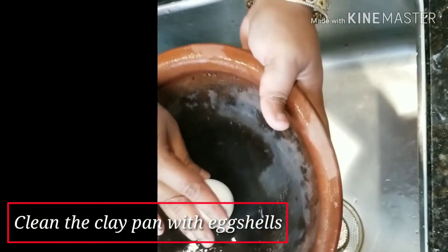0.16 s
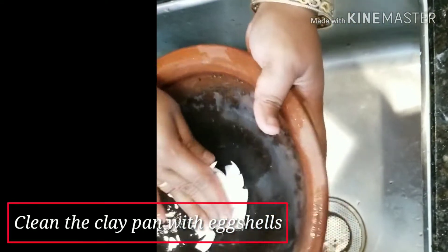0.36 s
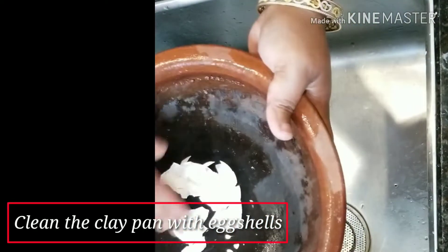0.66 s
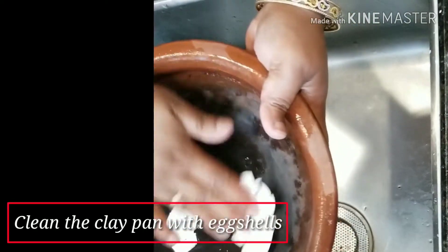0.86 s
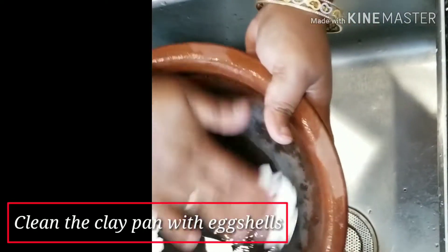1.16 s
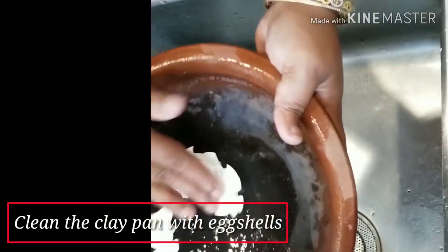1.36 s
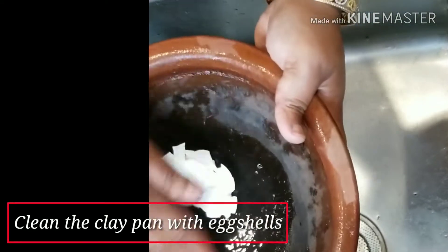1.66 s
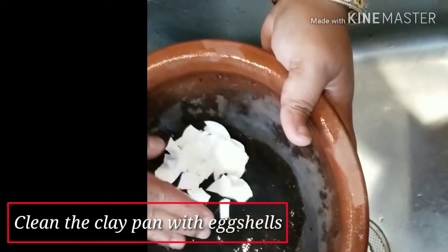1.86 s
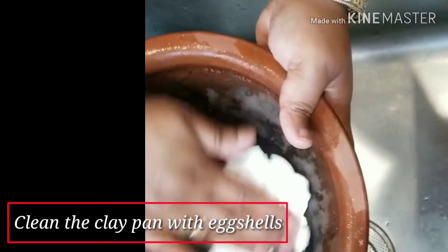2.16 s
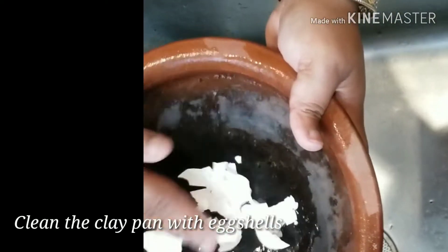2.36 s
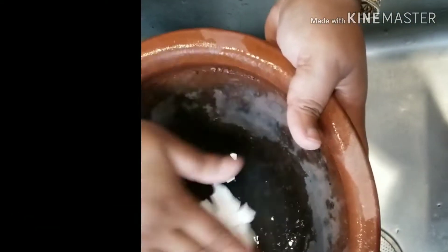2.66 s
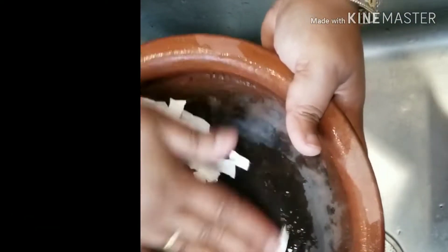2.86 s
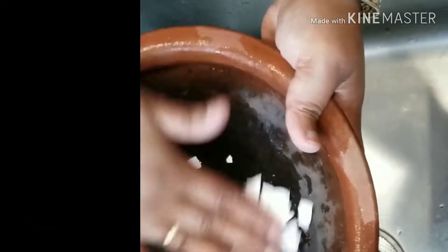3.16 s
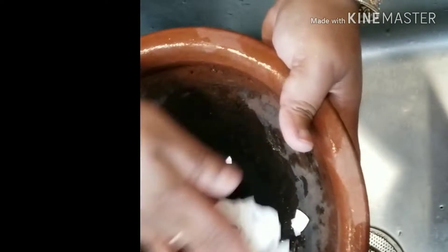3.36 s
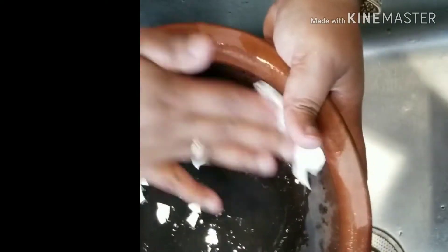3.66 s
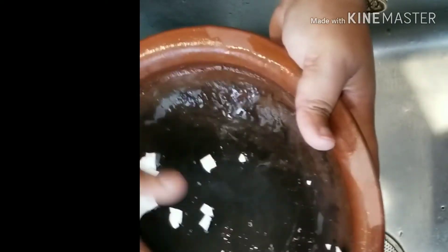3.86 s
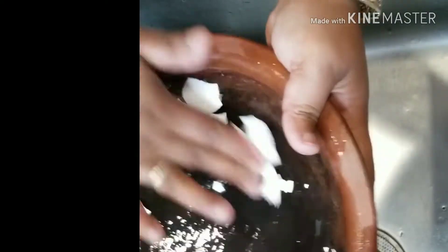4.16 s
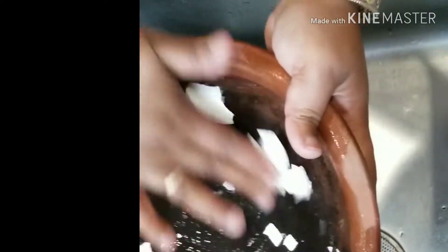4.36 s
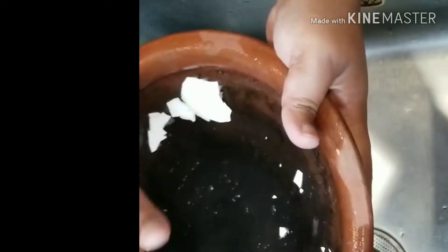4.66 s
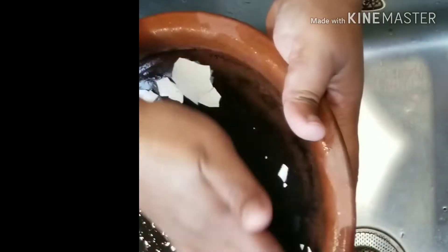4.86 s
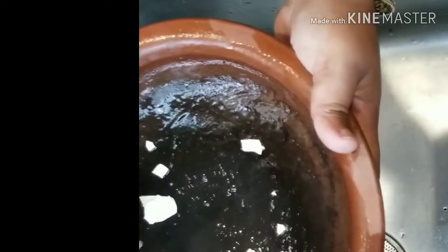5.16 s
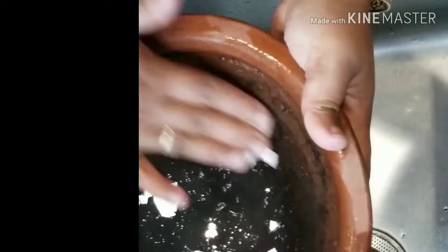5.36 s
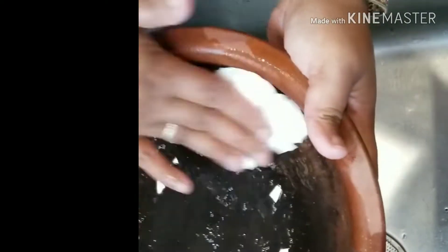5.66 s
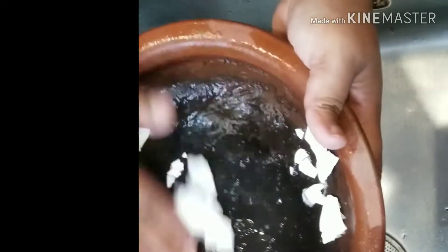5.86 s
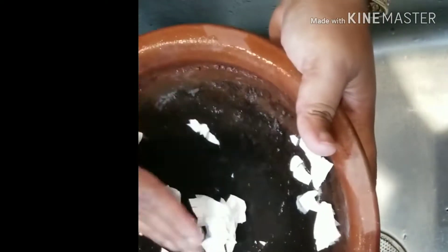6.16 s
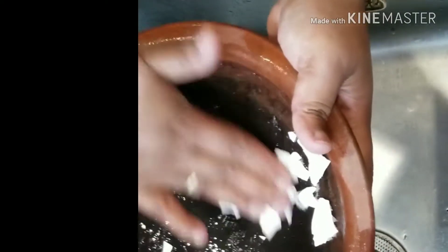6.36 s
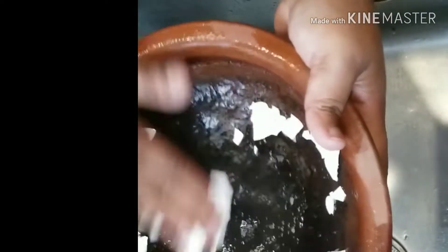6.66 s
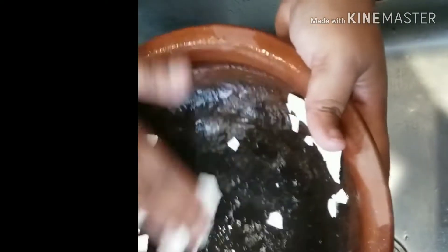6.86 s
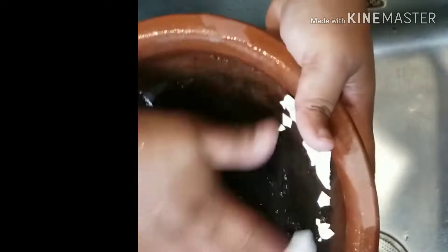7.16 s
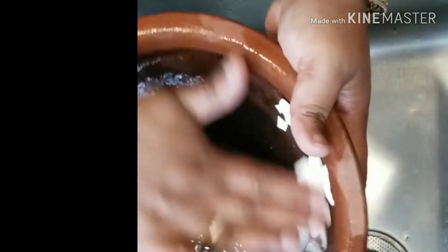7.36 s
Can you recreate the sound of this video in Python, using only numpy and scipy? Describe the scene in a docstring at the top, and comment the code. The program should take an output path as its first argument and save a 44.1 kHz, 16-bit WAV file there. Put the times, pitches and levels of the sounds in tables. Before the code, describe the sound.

In a small kitchen, heard close in stereo over a faint low hum and dull room air, an eggshell caves in almost immediately. From 0 to 0.3 seconds a volley of loud, sharp, hollow cracks bursts through a dull crumple and fine crackle. After a quiet gap with a small snap, gritty scraping runs from about 0.7 to 1.35 seconds, then shorter rubs at 1.6 and 2 to 2.3, with shell edges ringing the clay pan briefly. Another stroke begins at 2.5 with a clear snap. At about 2.85 the sound abruptly speeds up: scraping turns higher, brighter and fizzier, and its decays shorten. Short rubs lead into a longer to-and-fro scrub from 3.6 to 4.6, snapping near 4.2. Brisk strokes follow from 4.8 and 5.2, with soft bumps, then almost unbroken rubbing from 6.3 until the end at 7.5.

```python
"""A low hum; an eggshell caves in with a dull crumple amid a volley of sharp, hollow cracks.
A hand scrubs the pieces round a wet clay pan in gritty to-and-fro rubs, amid stray snaps and dull bumps.
Noise grains make the scrape, fizz and crumple; pushes on tuned resonances make the hollow, ring and thud.
A small kitchen answers with decaying noise; sines and shaped noise make the hum and room air.
Part-way through, playback jumps to a faster speed, so pitches rise and decays shorten."""
import sys
import numpy as np
from scipy import signal
from scipy.fft import rfft, irfft, next_fast_len
from scipy.io import wavfile
from scipy.ndimage import map_coordinates

SR = 44100
rng = np.random.default_rng(int(sys.argv[2]) if len(sys.argv) > 2 else 0)


def bounce(signal):
    """Save signal as a 16-bit WAV file at the path given by the first command-line argument."""
    frames = np.transpose(np.atleast_2d(signal))
    limited = np.clip(frames, -1, 1)
    pcm = np.round(limited * 32767).astype(np.int16)
    wavfile.write(sys.argv[1], SR, pcm)


N = 330750

# Levels in the tables come before each layer's own gain; f and widths are at natural speed, t is as heard.
# push and pull rubs, one list per stroke from landing to lifting: start t/s, length/s, scrape level/dB,
# sharp-edge fizz level/dB re scrape, pan ring level/dB re scrape
RUB_STROKES = [
    [(0.228, 0.049, -20.5, -2.5, 1), (0.305, 0.04, -41, -1, -14), (0.401, .08, -51.5, -6.5, 0.5),
     (0.507, .015, -57, -7, 0)],
    [(0.715, 0.034, -50, -0.5, 5.5), (0.762, 0.18, -37.5, -3.5, 1.5), (0.951, 0.18, -36.5, -3, 0),
     (1.128, 0.11, -33, -3.5, -1.5), (1.266, 0.084, -37.5, -4.5, 0)],
    [(1.561, .03, -52, 2.5, -14), (1.605, 0.035, -59.5, 0, -12), (1.656, 0.092, -34.5, -4, 1),
     (1.833, 0.066, -62, -5, -1)],
    [(1.949, 0.13, -38.5, -2, 2.5), (2.040, 0.23, -26, -4, -7.5), (2.249, 0.088, -33, -2, 1.5)],
    [(2.515, 0.19, -33, -3.5, 1.5), (2.626, 0.06, -26.5, -3, 0.5), (2.697, 0.13, -29, -0.5, 1),
     (2.859, .025, -37.5, 1, 5), (2.886, 0.023, -38.5, 5, 6.5), (2.987, 0.021, -57.5, -0.5, 10)],
    [(3.048, 0.12, -39.5, 6, -8), (3.139, 0.058, -33.5, 0, -7.5), (3.185, 0.036, -38, 2.5, 3)],
    [(3.391, 0.068, -34.5, 6.5, -0.5), (3.448, 0.066, -37, 9.5, -13.5), (3.559, 0.033, -54.5, 4.5, -0.5)],
    [(3.629, 0.27, -29, 4.5, -15), (3.854, 0.073, -36.5, 4.5, 4), (3.914, 0.1, -31.5, 4, 2.5),
     (4.006, 0.1, -34, 2.5, 1.5), (4.109, .10, -32, 2, 3), (4.206, 0.11, -32.5, 0, -3),
     (4.318, .09, -32, 2, 0), (4.422, 0.054, -28.5, 0.5, -2.5), (4.496, 0.078, -32, 3, 0.5),
     (4.572, 0.057, -32.5, 0.5, -6)],
    [(4.782, 0.24, -40, 4.5, -9.5), (4.943, 0.14, -28.5, 2.5, -15), (5.078, 0.071, -30.5, -1.5, -9.5)],
    [(5.234, .035, -40, 6.5, -2.5), (5.312, 0.076, -32, 1.5, -5.5), (5.418, .05, -32.5, 8.5, -3),
     (5.477, 0.17, -35, -0.5, -6.5), (5.593, 0.18, -30, 2.5, -2), (5.731, .065, -24.5, 0, -10),
     (5.790, 0.068, -30.5, 0, 3), (5.853, 0.13, -33.5, 2.5, 2.5), (5.973, 0.09, -30, -1.5, 3),
     (6.083, 0.051, -45, 3.5, 6), (6.173, 0.019, -67.5, 1, 7)],
    [(6.278, 0.086, -48, 2, 3), (6.332, 0.088, -35, 0.5, 2.5), (6.402, 0.091, -29, -3.5, -4.5),
     (6.493, 0.086, -29.5, -1, 1.5), (6.571, 0.13, -29.5, 1, -1.5), (6.672, 0.11, -30, 0.5, 0.5),
     (6.762, 0.15, -30, -2, -3), (6.861, 0.13, -28.5, -2.5, -2.5), (6.95, 0.14, -31.5, -2, -1),
     (7.077, .08, -32.5, 2, 3.5), (7.157, 0.12, -30, -1.5, -5), (7.262, 0.08, -32.5, -3, 0),
     (7.352, 0.077, -34.5, 0, -26), (7.437, .08, -36, 4.5, -8.5)],
]
# the palm's dull rub: t/s, level/dB at full pressure
PALM_CONTACT_CURVE = [(0.2, -25), (1.2, -27), (2.0, -28.5), (3.0, -25.5), (4.4, -21.5), (6.0, -24),
                      (7.5, -22.5)]
# the shell caving in under the palm: t/s, dull crumple level/dB, fine crackle level/dB
CRUSH_CURVE = [(0.035, -25.5, -36.5), (0.054, -31, -33), (0.094, -38, -48), (0.188, -26, -36),
               (0.214, -27.5, -35), (0.231, -12, -40.5), (0.3, -58.5, -48)]
# cracks of the whole shell: t/s, snap level/dB, hollow ring level/dB re snap
SHELL_CRACKS = [(0.0376, -20, 5.5), (0.0449, -4.5, -3), (0.0539, -12, 4.5), (0.0561, -17.5, 11),
                (0.128, -4.5, -16), (0.157, -4.5, -13), (0.1643, -13, -3.5), (0.1786, -10, 5.5),
                (0.1973, -5.5, -6.5), (0.2036, -7, -8), (0.232, -14.5, 2), (0.2385, -22.5, 2),
                (0.2473, -17, -5), (0.255, -19, -11.5), (0.263, -6.5, -25), (0.2705, -9, -15.5)]
# loose pieces snapping or tapping on the clay: t/s, snap level/dB, pan ring level/dB re snap
LOOSE_CHIPS = [(0.3533, -21, -3.5), (0.7437, -42.5, 7), (1.5722, -33, -23), (1.6508, -19, -18),
               (1.9617, -17.5, -17), (2.5221, -17.5, -9), (2.563, -11.5, -12.5), (2.9961, -42, 3.5),
               (3.1555, -18, -19), (3.3013, -33.5, -21), (3.3717, -28.5, -20), (3.556, -31, -26),
               (4.19, -13.5, -30), (4.7707, -25.5, -27), (5.247, -38, -22), (5.427, -26, -22),
               (6.31, -38, -5)]
# the hand bumping the pan dully: t/s, level/dB
HAND_BUMPS = [(1.179, -47), (2.659, -45), (3.154, -40), (3.76, -37), (5.769, -35)]
# ringing modes of the pan: f/Hz, width/Hz, level/dB
PAN_MODES = [(810, 40, -18), (1215, 50, -12), (1368, 28, 5), (1475, 100, -2), (1582, 45, -1),
             (1665, 50, -9), (2152, 42, -6), (2460, 40, -9), (2542, 42, -9), (2920, 36, -8),
             (3070, 80, -14), (3610, 60, -12)]
# ringing modes of the hollow shell: f/Hz, width/Hz, level/dB
HOLLOW_MODES = [(900, 60, -27), (1040, 90, -0.5), (1238, 51, -15), (1264, 82, -4), (1540, 99, 5.5),
                (1890, 66, -9), (2080, 100, -7), (2340, 58, -2)]
# low modes of the pan's thud: f/Hz, width/Hz, level/dB
THUD_MODES = [(170, 60, -6.5), (245, 60, 5.5), (325, 58, -0.5), (491.6, 20, -12)]
# tone of shell edges on clay: f/Hz, level/dB per Hz
GRIT_TONE = [(400, -48), (650, -29), (810, -16), (930, -19), (1280, -17), (1360, -5), (2000, -4),
             (2700, -2), (3800, 0), (5000, -1), (7400, -1), (8700, -6), (12500, -6), (16000, -7)]
# tone of pieces grinding dully: f/Hz, level/dB per Hz
GRIND_TONE = [(300, -40), (620, -14), (790, 0), (900, -1), (1100, -3), (1300, -14), (2000, -50)]
# tone of the rubbing palm: f/Hz, level/dB per Hz
PALM_TONE = [(40, -44), (100, 8.5), (170, -1), (250, 8), (350, 1.5), (480, -0.5), (600, -7.5), (800, -4.5),
             (1300, -22.5), (3000, -84)]
# tone of a snap: f/Hz, level/dB per Hz
SNAP_TONE = [(300, -6.5), (600, -24), (1000, -22.5), (2000, -7.5), (4500, 7), (7000, 6.5), (11000, 0.5),
             (16000, 7)]
# tone of the fine crackle: f/Hz, level/dB per Hz
CRACKLE_TONE = [(250, -28.5), (450, -21.5), (800, -1.5), (1400, 2.5), (3000, 4.5), (5000, -4.5), (8000, -7),
                (16000, -10.5)]
# decay of the kitchen's tail: f/Hz, t60/s
KITCHEN_DECAY = [(200, 0.52), (800, 0.33), (2000, 0.33), (6000, .34), (15000, .26)]
# stereo width: f/Hz, gain of side re mid/dB
STEREO_WIDTH = [(60, -17), (200, -13), (700, -8), (1400, -5), (2400, -1), (4400, 0), (15000, 0)]
# stereo lean: f/Hz, gain of left re right/dB
STEREO_LEAN = [(60, -.7), (1400, -.3), (3500, .5), (5500, 2.2), (8500, -.6), (11000, -.5), (15000, 0)]
# tone of the room air: f/Hz, level/dB per Hz
AIR_TONE = [(20, -10), (50, -1.5), (110, 0.5), (200, -5), (400, -12.5), (700, -23.5), (2000, -31.5),
            (16000, -46.5)]
# partials of the hum: f/Hz, level/dB
HUM_PARTIALS = [(53.6, -66.5), (107, -64), (120, -64), (254, -79.5)]
# slow swell of hum and air together: t/s, level/dB
BACKGROUND_SWELL = [(0, 3), (0.7, -7.5), (1.6, -2), (2.2, 1), (2.85, 1), (7.5, 1)]

NATURAL, FAST_SPEED = 1, 1.6  # playback speed ratios
FAST_FROM_S = 2.855
TOP_HZ = 15600  # band limit
# the first rub of a stroke bites; every rub is released at its end (at natural speed)
BITE_S, RELEASE_DB_PER_S = 0.014, 333.5
TURN_DB_PER_S = 259.5  # within a stroke the hand only turns round, and the next rub eases in
SWELL_DB, SWELL_GROWS = 16.5, 0.53  # swell depth in a one-second rub; shorter rubs swell less, by this power
SWELL_SKEW, SWELL_ROUND = 1.095, 0.96  # skew above 1 delays the peak; round above 1 makes it more pointed
FLUTTER_DB, FLUTTER_RATE = 0.51, 24  # pieces catch and let go; random knots a second at natural speed
FIZZ_GROWS, RING_GROWS = 0.99, 1.16  # light contact still fizzes; the ring falls faster than the pressure
PALM_GROWS = 0.88  # the palm's rub follows the pressure less than dB for dB
EDGE_HZ, EDGE_DB = 1302, -5.5  # below its first strong mode the pan's ring is turned down this much
GRIND_DB = -26.5  # grinding under the fingers, on top of the scrape's contact level
CRACK_THUD_DB, CHIP_THUD_DB = -27.5, -31.5  # thud push re a crack's hollow push, and re a chip's snap level


def amp(db):
    """Decibels to gain."""
    return 10 ** (np.asarray(db) / 20)


def unit(x):
    """Scale to rms 1."""
    return x / np.sqrt(np.mean(np.abs(x) ** 2) + 1e-20)


def along(points, hz):
    """Read (f/Hz, value) points on a log frequency axis."""
    f, value = np.transpose(points)
    return np.interp(np.log(hz + 1), np.log(f + 1), value)


def gate(s, db, rise):
    """A gain per sample from a level curve; the contact takes a moment to build."""
    t = np.arange(N) / SR
    onset = np.clip((t - s[0]) / rise, 0, 1)
    return amp(np.interp(t, s, db)) * onset * (t < s[-1])


def wobble(rate):
    """A smooth random curve, rate knots a second."""
    knots = rng.standard_normal(int(N * rate / SR) + 4)
    return map_coordinates(knots, [np.arange(N) * rate / SR], order=2)


def filtered(x, response):
    """Filter x by a complex response of frequency."""
    m = next_fast_len(N + SR // 4, True)
    return irfft(rfft(x, m) * response(np.fft.rfftfreq(m, 1 / SR)), m)[..., :N]


def colour(x, spectrum, speed):
    """Shape noise by a spectrum, keeping its power."""
    return filtered(x, lambda hz: unit(amp(along(spectrum, hz / speed))))


def resonate(x, modes, speed, cutoff_hz):
    """Ring a body's modes with x at rms gain 1; below the cutoff a small body hardly radiates."""
    def response(hz):
        f = hz / speed
        body = sum(amp(db) * 1j * f * w / (c * c - f * f + 1j * f * w) for c, w, db in modes)
        radiation = (f * f / (cutoff_hz ** 2 - f * f + 1j * f * cutoff_hz)) ** 2
        return unit(body * radiation)
    return filtered(x, response)


def grains(rate, spread_db, clump_db, clump_rate):
    """Sizes of tiny slips: random in time, a few large, bunched in clumps."""
    slips = rng.random(N) < rate / SR
    size = amp(spread_db * np.minimum(rng.standard_exponential(N), 5.5))  # caps the rare giants
    return unit(slips * size * amp(clump_db * wobble(clump_rate)))


def scatter(sizes):
    """Mid and side pushes: every slip happens at another spot, with another sign."""
    return sizes * rng.standard_normal((2, N))


def bursts(times, levels_db, t60):
    """A short dying spray of fractures at each time."""
    t, size = np.arange(SR // 20) / SR, np.zeros(N + SR)
    for s, db in zip(times, levels_db):
        size[round(s * SR):][:len(t)] += amp(db - 60 * t / t60)
    return scatter(size[:N])


def blows(times, levels_db):
    """One push at each time, near the middle and leaning a little to either side."""
    push = np.zeros((2, N))
    mid_side = np.array([np.ones(len(times)), rng.standard_normal(len(times)) / 2])
    push[:, np.round(times * SR).astype(int)] = amp(levels_db) * mid_side
    return push


def scrubbing(speed):
    """Shell edges slip over the clay: they scrape and fizz, ring the pan, and the palm rubs dully."""
    scrape, fizz, ring = hand(speed)
    pressure = np.sqrt(scrape * ring)
    contact = amp(np.interp(np.arange(N) / SR, *np.transpose(PALM_CONTACT_CURVE)))
    rub = contact * pressure ** PALM_GROWS
    slips = grains(rate=11000 * speed, spread_db=1.7, clump_db=1.2, clump_rate=110 * speed)
    # the pieces shift under the fingers, and each spot of the pan favours other modes
    edges = roam(scatter(slips), depth_db=2.3, width_hz=160 * speed, rate=20 * speed)
    drive = roam(scatter(slips), depth_db=4, width_hz=130 * speed, rate=14 * speed)
    # the grit's tone splits at 7500 Hz into scrape below and fizz above
    sharp = lambda hz: 1 / (1 + (7500 / (hz + 1)) ** 8)
    grit = lambda hz: amp(along(GRIT_TONE, hz / speed))
    out = amp(-4.0) * filtered(edges * scrape, lambda hz: unit(grit(hz) * (1 - sharp(hz))))
    out += amp(-3.0) * filtered(edges * fizz, lambda hz: unit(grit(hz) * sharp(hz) * (hz < TOP_HZ)))
    under_edge = lambda hz: 1 / (1 + (hz / speed / EDGE_HZ) ** 60)
    rung = resonate(drive * ring, PAN_MODES, speed, cutoff_hz=1480)
    out += amp(1.0) * filtered(rung, lambda hz: amp(EDGE_DB * under_edge(hz)))
    out += amp(GRIND_DB) * colour(scatter(slips * scrape), GRIND_TONE, speed)
    return out + amp(-4) * colour(scatter(slips * rub), PALM_TONE, speed)


def hand(speed):
    """Gains of scrape, fizz and ring; within a stroke each rub takes over from the one before."""
    gains, t = np.zeros((3, N)), np.arange(N) / SR
    for stroke in RUB_STROKES:
        for k, (start, length, db, fizz_db, ring_db) in enumerate(stroke):
            near = slice(*np.searchsorted(t, [start - .06, start + length + .25]))
            shape = rub_shape(t[near] - start, length, k > 0, speed)
            scrape = amp(db) * shape
            fizz = amp(db + fizz_db) * shape ** FIZZ_GROWS
            ring = amp(db + ring_db) * shape ** RING_GROWS
            gains[:, near] = np.maximum(gains[:, near], [scrape, fizz, ring])
    return gains * amp(FLUTTER_DB * wobble(FLUTTER_RATE * speed))


def rub_shape(t, length, turning, speed):
    """Gain of one rub, t seconds after its start: it bites or eases in, swells and is released."""
    phase = np.clip(t / length, 0, 1)
    arch = np.abs(np.sin(np.pi * phase ** SWELL_SKEW)) ** SWELL_ROUND
    depth_db = SWELL_DB * (length * speed) ** SWELL_GROWS
    db = depth_db * (arch - 1) - RELEASE_DB_PER_S * speed * np.maximum(t - length, 0)
    if turning:
        return amp(db + TURN_DB_PER_S * speed * np.minimum(t, 0))
    return amp(db) * np.clip(t * speed / BITE_S, 0, 1)


def roam(x, depth_db, width_hz, rate):
    """As the contact moves, some bands swell and others drop out."""
    hz, t, z = signal.stft(x, SR, nperseg=512)
    knots = rng.standard_normal((int(hz[-1] / width_hz) + 3, int(t[-1] * rate) + 3))
    field = map_coordinates(knots, np.meshgrid(hz / width_hz, t * rate, indexing="ij"), order=1)
    moved = signal.istft(z * amp(depth_db * unit(field)), SR, nperseg=512)[1]
    return unit(moved[:, :N])


def crushing():
    """The whole shell cracks in a quick volley amid its crumple; each crack rings the hollow and thuds."""
    s, db, ring_db = np.transpose(SHELL_CRACKS)
    snaps = amp(-12) * colour(bursts(s, db, t60=0.018), SNAP_TONE, NATURAL)
    # the wall gives way over a moment, so the push on the hollow is soft
    push = filtered(blows(s, db + ring_db), lambda hz: 1 / (1 + 1j * hz / 2600) ** 3)
    hollow = amp(21) * resonate(push, HOLLOW_MODES, NATURAL, cutoff_hz=896)
    thud_push = blows(s, db + ring_db + CRACK_THUD_DB)
    thuds = amp(19.5) * resonate(thud_push, THUD_MODES, NATURAL, cutoff_hz=120)
    # all through the cracks, small splits keep running through the shell
    s, crumple_db, crackle_db = np.transpose(CRUSH_CURVE)
    splits = grains(rate=3000, spread_db=2.2, clump_db=3, clump_rate=130)
    crumple_push = scatter(splits * gate(s, crumple_db, rise=.003))
    crumple = amp(-2) * resonate(crumple_push, HOLLOW_MODES[:3], NATURAL, cutoff_hz=680)
    crackle_push = scatter(splits * gate(s, crackle_db, rise=0.0016))
    crackle = amp(6) * colour(crackle_push, CRACKLE_TONE, NATURAL)
    return snaps + hollow + thuds + crumple + crackle


def chips(speed):
    """Single pieces snap or tap; the pan rings briefly and thuds under the hand."""
    s, db, ring_db = np.transpose(LOOSE_CHIPS)
    snaps = amp(-7) * colour(bursts(s, db, t60=.026 / speed), SNAP_TONE, speed)
    thuds = amp(15.0) * resonate(blows(s, db + CHIP_THUD_DB), THUD_MODES, speed, cutoff_hz=280)
    rings = amp(19.5) * resonate(blows(s, db + ring_db), PAN_MODES, speed, cutoff_hz=1500)
    return snaps + thuds + rings


def bumps(speed):
    """The heel of the hand bumps the pan, which thuds in its low modes."""
    s, db = np.transpose(HAND_BUMPS)
    return amp(12.5) * resonate(blows(s, db), THUD_MODES, speed, cutoff_hz=260)


def kitchen(x, speed):
    """The room's diffuse noise tail has its own decay per band and is renewed as the hand moves."""
    hop = SR // 4  # a fresh tail every quarter second, crossfaded
    fade = np.sin(np.pi * np.arange(2 * hop) / (2 * hop))
    x, out = np.pad(x, ((0, 0), (hop, 2 * hop))), np.zeros((2, N + 2 * SR))
    for start in range(0, N + hop, hop):
        hz, t, z = signal.stft(rng.standard_normal((2, SR // 2)), SR, nperseg=256)
        t60 = along(KITCHEN_DECAY, hz / speed)[:, None]
        tail = signal.istft(z * amp(-60 * t * speed / t60), SR, nperseg=256)[1]
        tail = tail / np.linalg.norm(tail[0])
        echo = signal.fftconvolve(x[:, start:start + 2 * hop] * fade, tail, axes=1)
        out[:, start:start + echo.shape[1]] += echo
    delay = round(.003 * SR / speed)  # the tail starts just after the direct sound
    return out[:, hop - delay:][:, :N]


def spread(pair, speed):
    """Mid and side to left and right: bass near mono, treble wide."""
    mid, side = pair[0], filtered(pair[1], lambda hz: amp(along(STEREO_WIDTH, hz / speed)))
    lean = lambda hz: amp(np.outer([.5, -.5], along(STEREO_LEAN, hz / speed)))
    return filtered(np.array([mid + side, mid - side]), lean)


def sink(pan, speed):
    """The pan's sound in the room, as heard at one playback speed."""
    return spread(pan + amp(-9) * kitchen(pan, speed) + background(speed), speed)


def background(speed):
    """An unsteady hum of sines over dull room air made of shaped noise."""
    out = amp(-66.0) * colour(scatter(1), AIR_TONE, speed)
    t = np.arange(N) / SR
    for hz, db in HUM_PARTIALS:
        level = amp(db + 1.5 * wobble(8.2)) * np.sqrt(2)
        out[0] += level * np.sin(2 * np.pi * hz * speed * t + 0.44 * wobble(7.9))
    return out * amp(np.interp(t, *np.transpose(BACKGROUND_SWELL)))


def scene():
    """Natural speed first, then an abrupt change to fast playback."""
    washing = lambda speed: scrubbing(speed) + chips(speed) + bumps(speed)
    natural = sink(crushing() + washing(NATURAL), NATURAL)
    fast = sink(washing(FAST_SPEED), FAST_SPEED)
    change = np.clip((np.arange(N) / SR - FAST_FROM_S) / .004, 0, 1)  # a 4 ms crossfade
    return natural * np.sqrt(1 - change) + fast * np.sqrt(change)


def record(dry):
    """Soft limiting rounds off the highest peaks, then a steep low-pass cuts at the band limit."""
    rounded = dry / (1 + np.abs(dry / .85) ** 6) ** (1 / 6)
    return filtered(rounded, lambda hz: 1 / np.sqrt(1 + (hz / TOP_HZ) ** 160))


dry = scene()
out = record(dry)
bounce(out)
```